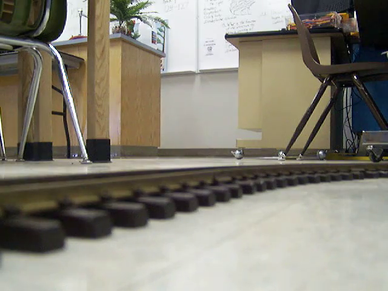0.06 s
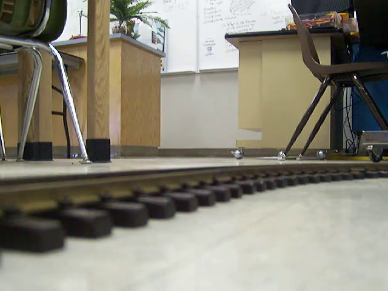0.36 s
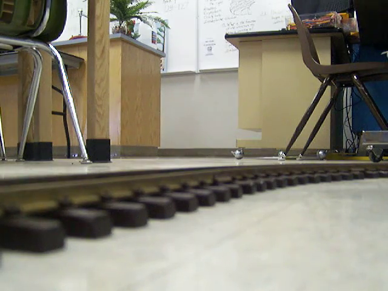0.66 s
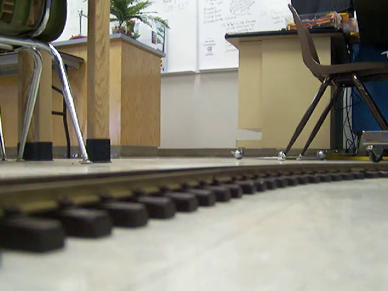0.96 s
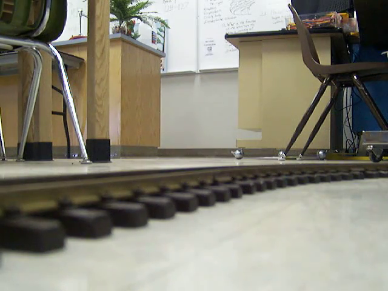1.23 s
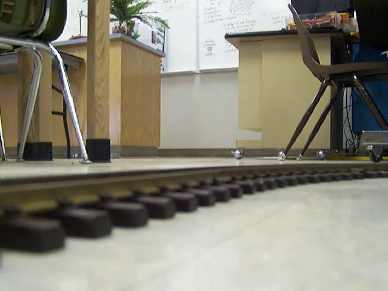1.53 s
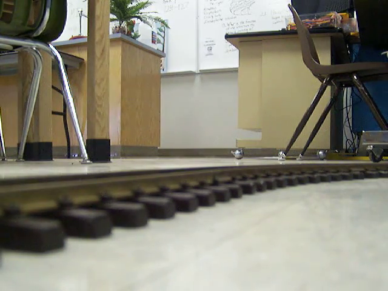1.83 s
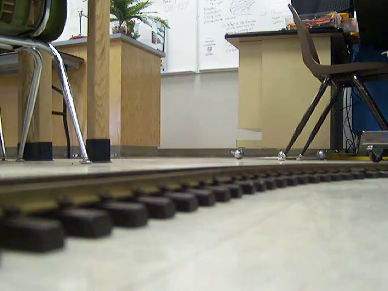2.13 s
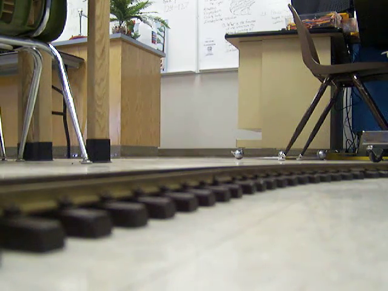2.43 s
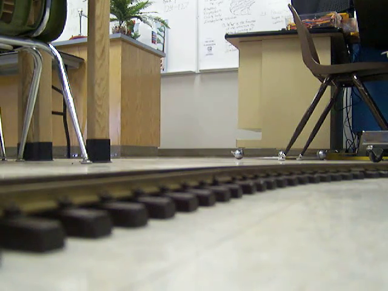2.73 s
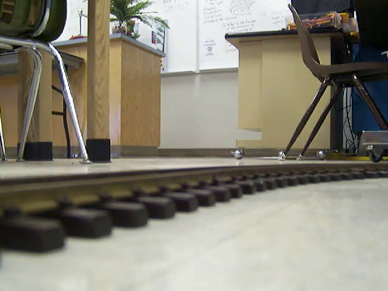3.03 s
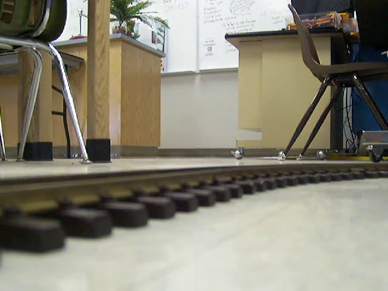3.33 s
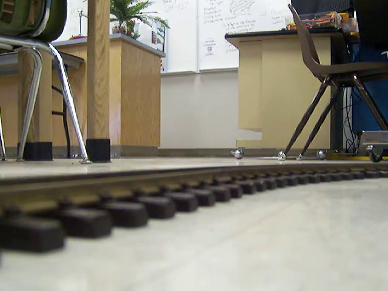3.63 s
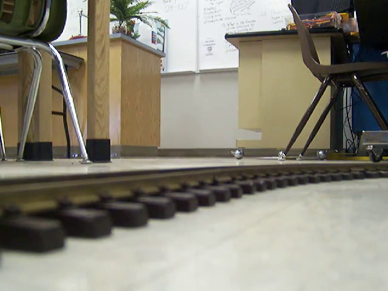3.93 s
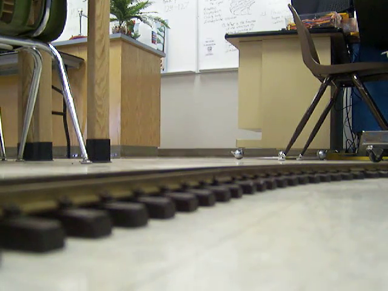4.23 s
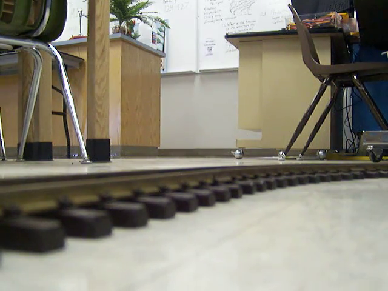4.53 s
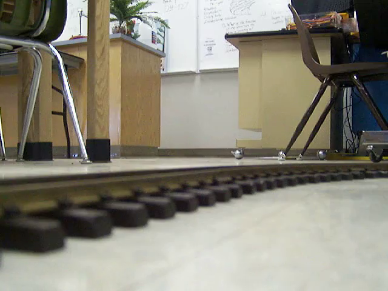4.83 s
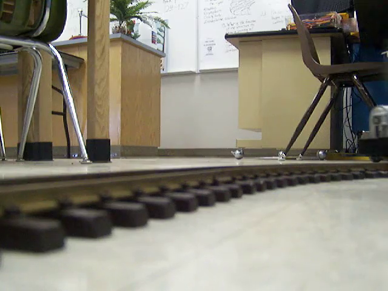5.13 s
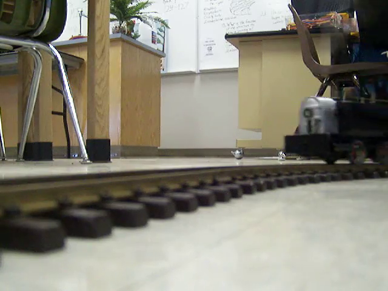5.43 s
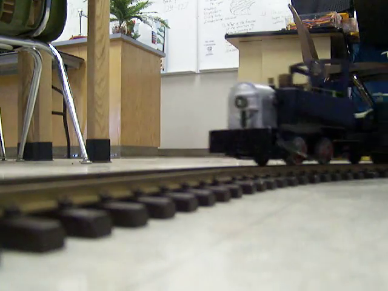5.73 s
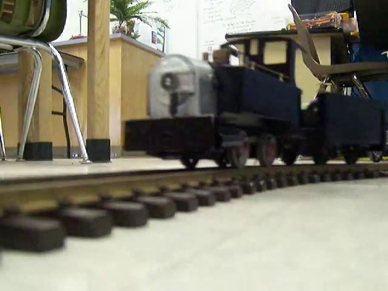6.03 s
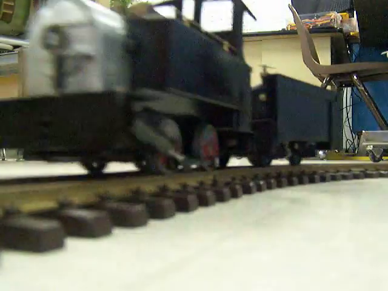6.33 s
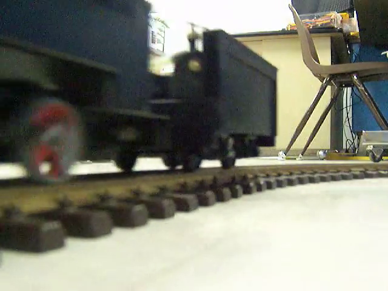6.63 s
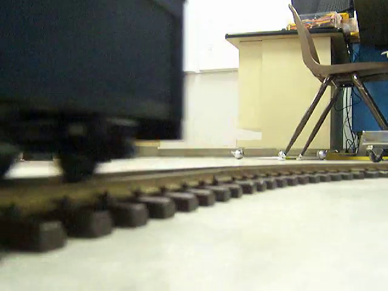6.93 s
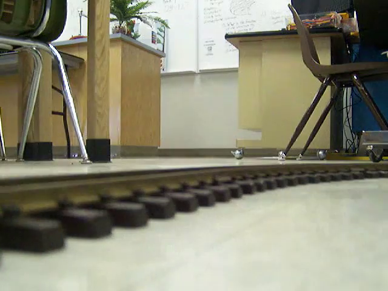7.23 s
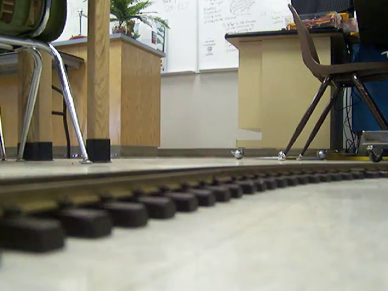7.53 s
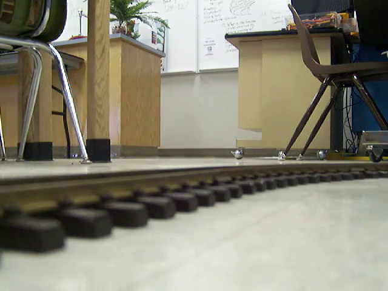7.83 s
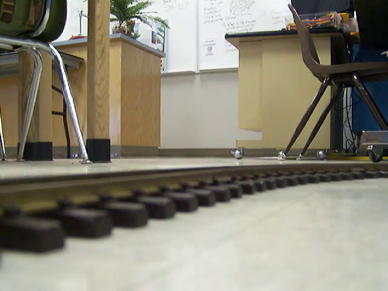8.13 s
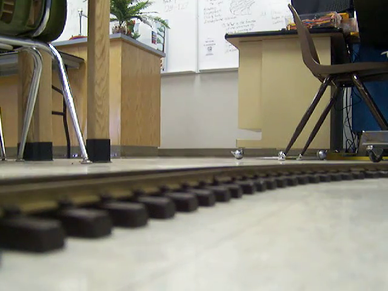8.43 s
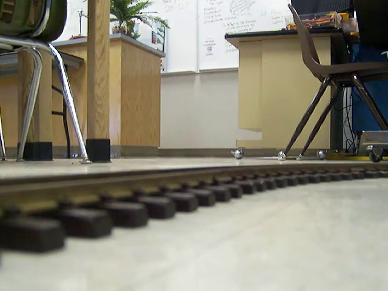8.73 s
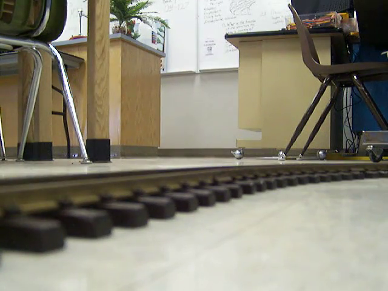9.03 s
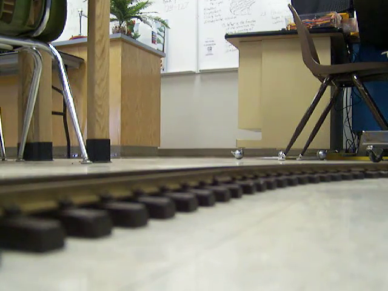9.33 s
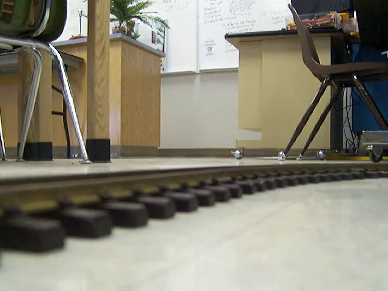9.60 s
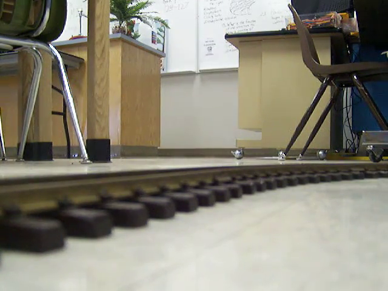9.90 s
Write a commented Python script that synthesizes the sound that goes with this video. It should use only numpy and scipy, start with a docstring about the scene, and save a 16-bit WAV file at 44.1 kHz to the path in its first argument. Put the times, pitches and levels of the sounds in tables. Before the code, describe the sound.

A small model steam locomotive circles a hard-floored room, chuffing quickly with sharp, wet spits over a steady hiss. Its rods knock, couplings clank and the burner gives a faint, breathy whistle. The sound swells early with loud sputters, keeps going, then passes close to the floor-level microphone from right to left with a brief rumble of wheels. It fades and builds again at the end, over a low fan hum.

```python
"""Model steam engine circling a room

A live steam model locomotive and tender circle a hard-floored room, passing close from right to left.
Each piston stroke knocks the rods and spits wet exhaust; the second cylinder puffs in between, and the
odd slug of water bursts loudly. Steam hisses, drops tick, couplings clank, the burner roars in its flue
and the rails ring, over fan hum and a deep rumble. The mix swells and sinks, coloured by two floor
microphones that each ring at a treble pitch of their own."""
import sys
import numpy as np
from scipy import signal
from scipy.fft import rfft, irfft, next_fast_len
from scipy.io import wavfile

SR = 44100
rng = np.random.default_rng(int(sys.argv[2]) if len(sys.argv) > 2 else 0)


def wav_record(signal):
    """Record a signal, one row per channel, as 16-bit PCM in the file named by sys.argv[1]."""
    frames = np.transpose(np.atleast_2d(signal))
    bounded = np.clip(frames, -1, 1)
    # unit amplitude maps onto the largest positive 16-bit level
    quanta = np.round(bounded * 32767).astype(np.int16)
    wavfile.write(sys.argv[1], SR, quanta)


N = 439236

# Spit, slug and drop levels are rms over 10 ms behind the microphones, before panning.
# Pan is left minus right.
# piston strokes: t/s, spit level/dB, spit pan/dB, knock peak before panning/dB
PISTON_STROKES = [(0.0566, -27.5, 8.5, -23), (0.224, -33.5, 3.5, -32), (0.3945, -28.5, 9, -31),
                  (0.548, -34, 5, -22), (0.715, -30, 0, -23), (0.88, -30, -5, -25),
                  (1.0513, -23.5, -7, -18), (1.224, -20, -3, -15), (1.402, -16.5, 0, -10.5),
                  (1.5783, -15.5, -7, -9.5), (1.758, -17, -10.5, -11), (1.9391, -15, -8, -8.5),
                  (2.1176, -16.5, -12, -11), (2.287, -16, -4, -17), (2.444, -15.5, -5, -16),
                  (2.589, -12, -5, -19), (2.735, -29, -8, -26), (2.889, -26.5, -15, -21),
                  (3.036, -26, -16, -21), (3.1871, -19, -6, -24), (3.339, -22.5, -15, -17.5),
                  (3.4948, -21.5, -11, -16), (3.6556, -22.5, -10, -17), (3.819, -20, -9, -21),
                  (3.9838, -19.5, -10, -24), (4.1505, -15, -9, -29), (4.3185, -17, -9.5, -19),
                  (4.490, -15, -13.5, -25), (4.662, -15, -11.5, -19), (4.8407, -17, -6, -24),
                  (5.024, -15, -6, -29), (5.212, -15, -8, -23), (5.4017, -13, -2.5, -25),
                  (5.597, -19, -7, -27), (5.797, -17, -8, -21), (6.005, -14.5, -7.5, -25),
                  (6.213, -17, -5, -30), (6.406, -11, -0.5, -34), (6.581, -14, 0, -19.5),
                  (6.742, -16, 1, -30), (6.8921, -19.5, 15, -16), (7.046, -21.5, 15, -26),
                  (7.201, -29, 6, -32), (7.355, -29, 8, -26), (7.513, -30.5, 9, -27), (7.675, -38, 7, -24),
                  (7.8395, -31, 3, -35), (8.016, -32, 3, -38), (8.180, -32, 8, -25.5),
                  (8.3533, -25, 7, -24), (8.5333, -33, -3, -25), (8.7135, -32, 8, -25),
                  (8.893, -26.5, 6, -21.5), (9.079, -30, 3, -17.5), (9.2653, -24.5, 1, -17.5),
                  (9.4586, -18.5, -4, -13.5), (9.655, -19.5, -8.5, -13), (9.8515, -13, -3.5, -11)]
# slugs of water bursting from the chimney: t/s, level/dB, length/s, pan/dB
WATER_SLUGS = [(0.28, -29.5, 0.01, 17), (0.6358, -24.5, 0.0038, 13), (0.801, -21, 0.007, 7),
               (0.8488, -13, 0.021, 2), (0.9657, -17.5, 0.012, 2), (1.1437, -16.5, 0.0044, 7),
               (1.3194, -18.5, 0.006, 4), (1.449, -6.5, 0.02, 0.5), (1.4939, -8.5, 0.023, 1),
               (1.5622, -8.5, 0.021, -4), (2.064, -7.5, 0.015, -2), (2.1782, -9.5, 0.011, -3),
               (2.6765, -9, 0.019, -3), (2.6965, -11, 0.011, -5), (2.7151, -12.5, 0.0068, -10),
               (3.0841, -11.5, 0.0076, -6), (3.6222, -11, 0.0074, 0), (3.749, -14, 0.0037, -3),
               (3.9127, -20, 0.0045, 2), (4.1845, -10.5, 0.0058, -1.5), (4.2905, -14.5, 0.0051, -2),
               (4.7658, -9, 0.005, -1), (4.774, -9, 0.0059, -1), (4.7931, -17, 0.0044, 0),
               (4.8888, -12.5, 0.0047, 0), (5.0542, -20, 0.004, 0), (5.4086, -21, 0.0059, 18),
               (5.416, -8, 0.0024, 1), (5.8313, -17.5, 0.0075, 4), (6.1083, -8, 0.0028, 7.5),
               (6.2414, -13.5, 0.0026, -3), (6.3304, -13.5, 0.0015, -8), (6.7008, -7, 0.0037, 3.5),
               (6.8061, -19.5, 0.0038, 6), (7.015, -16, 0.0032, 4), (7.2227, -21.5, 0.0068, 17),
               (7.241, -18, 0.0014, 17.5), (7.32, -21.5, 0.0035, 5), (7.6608, -28.5, 0.0053, 17),
               (7.7676, -21.5, 0.0053, 5.5), (8.4675, -24, 0.016, 5), (8.9713, -20, 0.016, 4),
               (9.6309, -11, 0.02, 0), (9.7587, -13, 0.0094, -4.5)]
# big drops ticking between the strokes: t/s, level/dB, pan/dB
BIG_DROPS = [(1.68, -20.5, 11), (2.653, -21, -11), (2.761, -18.5, -1), (3.144, -19, -1),
             (3.412, -19.5, -10), (3.682, -19, 5), (3.728, -23, 1), (4.2475, -17.5, -3), (4.346, -18.5, -2),
             (4.565, -23, -9), (4.870, -22, 4), (5.153, -22, -6), (5.243, -20.5, 1), (5.343, -23.5, -9),
             (5.531, -24, 0), (5.5515, -24.5, -1), (5.63, -22, 1), (5.735, -25, 4), (5.916, -25, -3),
             (6.040, -25, 7), (6.13, -23, 5), (6.301, -28, -5), (6.347, -27, -5), (6.537, -18.5, -1),
             (6.638, -22, -7), (6.653, -20.5, 3), (6.965, -21.5, 9), (7.144, -22.5, 11), (7.699, -28.5, 6),
             (7.811, -28.5, 4), (8.739, -32, 8), (9.118, -23, 1)]
# coupling clanks: t/s, peak before panning/dB, ring f/Hz, ring over the dull knock/dB
COUPLING_CLANKS = [(1.657, -18, 2400, 2), (1.837, -12, 2400, 0), (2.019, -15, 2360, 6),
                   (2.355, -13, 2580, 5), (2.412, -14.5, 2400, 0), (2.5204, -10.5, 2530, 6),
                   (2.65, -11.5, 2500, 1), (2.883, -13, 2570, 14), (2.996, -16, 1900, 5),
                   (3.404, -7.5, 2470, 8), (3.5297, -14, 2460, 6), (3.891, -19, 2500, -1),
                   (3.959, -11, 2510, 16), (5.1552, -15, 2400, -2), (5.972, -16.5, 1870, 8),
                   (6.651, -16, 2400, -7), (6.8046, -11, 2800, 5), (7.014, -11, 2880, -2),
                   (7.1258, -13.5, 2560, 11), (8.119, -22, 2520, -3), (9.36, -12.5, 2640, 10),
                   (9.545, -18, 2400, 2), (9.741, -12, 2400, -1)]

# the swell that steam, burner, rail ring and fan ride on: t/s, level/dB
SWELL_CURVE = [(0, -46.5), (0.45, -46.5), (1.4, -34.5), (2.1, -38.5), (2.68, -38), (2.75, -45),
               (3.5, -41.5), (4.2, -43.5), (4.63, -42), (4.7, -46), (5.4, -45.5), (5.45, -48.5),
               (6.2, -47.5), (8.5, -50), (9.65, -36), (9.96, -36)]
# direction of the engine: t/s, lag of the left side/ms, pan/dB
ENGINE_BEARING = [(0, 0.0077, 2), (1, 0.087, 0), (2.6, 0.19, -6.5), (4.5, 0.18, -4), (5.3, 0.02, -2.5),
                  (6.3, 0.0031, -3), (6.7, -0.12, 3), (7.2, -0.26, 6.5), (7.8, -0.1, 3), (8.6, -0.087, 1),
                  (9.1, 0.11, -1.5), (9.96, 0.12, -1)]
# steam, stronger as the engine nears: t/s, level over the swell/dB
STEAM_CURVE = [(0, 11), (1.0, 14.5), (1.35, 13.5), (1.7, 16), (3.501, 16), (4.45, 21), (4.75, 18.5),
               (6.35, 21), (6.85, 23), (7.12, 25), (7.32, 17), (8.399, 12), (9.96, 13)]
# burner between flares: t/s, level over the swell/dB
BURNER_CURVE = [(0, 3), (1.3, 3.5), (1.701, 5), (2.75, 1), (4, -2), (5.2, 7), (5.5, 4.5), (6, 11.5),
                (6.45, 8), (6.63, 14), (6.8, 6), (7.35, 5.5), (7.75, 9), (8.15, 0), (9.96, 4)]
# flare-ups of the flame: t/s, strength/dB
FLAME_FLARES = [(6.23, 5), (8.618, 14.5)]
# rails ringing on the far side of the loop: t/s, level over the swell/dB
RAIL_CURVE = [(0, -1), (1.2, -2.5), (2.68, 3.5), (2.8, -4), (3.5, -0.5), (4.62, 1.5), (4.72, -14.5),
              (8.499, -1), (9.3, -3.5), (9.96, -3)]

# tone of the wet exhaust: f/Hz, level/dB
SPIT_SPECTRUM = [(150, -17), (700, -11), (1500, -9.5), (2500, -6), (4000, -1), (5200, 2.5), (6300, -5),
                 (7500, -13), (9000, 4)]
# tone of the steam jet: f/Hz, level/dB
STEAM_SPECTRUM = [(150, -24.5), (400, -20), (800, -4), (1400, -1), (2000, -1), (2650, 2.5), (3200, 0),
                  (4200, -0.2), (5200, 2.5), (6300, -2.5), (7500, -11), (9000, -14.5)]
# tone of the ventilation noise: f/Hz, level/dB
VENT_SPECTRUM = [(12, 4.5), (28, 0), (46, -25.5), (60, -3.5), (78, 7), (100, -4.5), (143, 2), (175, -7.5),
                 (300, -11), (600, -10.5), (1300, -13), (2000, -13), (4000, -29)]
# hum of the fan and its motor: f/Hz, relative level/dB
FAN_TONES = [(19, 2.5), (79.5, -11), (120, -4), (200, -12.5)]
# tone of the building's rumble: f/Hz, level/dB
BUILDING_SPECTRUM = [(10, -9.5), (22, 0), (34, -1.5), (42, -2), (60, -16.5), (150, -39), (400, -70)]
# likeness of left and right in diffuse sound: f/Hz, correlation (clipped to -1..1 in use)
STEREO_LIKENESS = [(20, -1.1), (60, 1), (200, 0.91), (500, 0.93), (1000, 0.34), (1800, 0.12), (3000, 0.13),
                   (5000, -0.19)]

# modes of the engine's frame: f/Hz, width/Hz, level/dB
FRAME_MODES = [(1150, 650, -9), (1840, 270, 0), (2410, 200, -2), (3320, 1200, -6.5)]
# resonance of the burner flue: f/Hz, width/Hz, level/dB
FLUE_MODES = [(1083, 250, 0)]
# modes of the track under the wheels: f/Hz, width/Hz, level/dB
TRACK_MODES = [(328, 290, -12.5), (556, 220, -5), (690, 125, -1), (1495, 81, -3.5), (2560, 100, -14.5)]
# modes of the distant rails: f/Hz, width/Hz, level/dB
RAIL_MODES = [(719, 36, 4.5), (905, 56, 3.5), (1010, 320, -6.5), (1505, 70, -7), (1700, 120, -8),
              (1935, 40, -0.5)]
# microphone resonances, left then right: f/Hz, width/Hz, gain in the bass/dB
CAPSULES = [(6007, 716, -4.5), (4753, 990, -3.5)]

ROOM_T60_S = 0.13


def chuffs(steam_db, pan, spit_s=0.0028, puff_s=0.019, offbeat_share=0.53):
    """Cue a sharp spit per stroke and the second cylinder's puff between: t/s, dB, length/s, pan/dB."""
    cues = [(s, db, spit_s, side_db) for s, db, side_db, _ in PISTON_STROKES]
    times = np.array(PISTON_STROKES)[:, 0]
    for s in times[:-1] + offbeat_share * np.diff(times):
        at = int(s * SR)
        puff_db = steam_db[at] + 1.5 + 0.8 * rng.standard_normal()
        cues.append((s, puff_db, puff_s, pan[at] + 3))
    return cues


def spits(cues, lag_ms, wash_db=-19.5, stray_db=-15.0, spray_takeover_s=0.009):
    """Wet exhaust: a short spit is mostly one ping, a long one a lumpy spray that builds and dies."""
    out, t = np.zeros((2, N)), np.arange(4096) / SR
    for s, db, length, pan in cues:
        lag, sides = lag_ms[int(s * SR)], panned(pan)[:, None]
        lumps = from_db(-0.5 * np.interp(t, t[::40], rng.standard_normal(len(t[::40]))))
        noise = colour(arriving(np.full(len(t), lag), direct=0.17), SPIT_SPECTRUM)
        envelope = (1 - np.exp(-t / (0.12 * length))) * np.exp(-t / (0.96 * length))
        spray = levelled(noise * lumps * envelope)
        ping_share = np.exp(-length / spray_takeover_s)
        burst = np.sqrt(1 - ping_share) * spray + np.sqrt(ping_share) * ping(lag, hz=5100, size=len(t))
        scatter = unit_level(colour(diffuse(len(t)), SPIT_SPECTRUM))
        room_wash = scatter * from_db(wash_db - 60 * t / ROOM_T60_S) * (1 - np.exp(-t / 0.0031))
        add(out, s, from_db(db) * (burst * sides + room_wash))
        # one stray drop bursts just ahead, two trail behind
        delays_s = rng.uniform([-.012, .008, .025], [-.003, .025, .06])
        for delay, grain in zip(delays_s, np.split(scatter, 4, axis=1)):
            stray = grain * np.exp(-t[:grain.shape[1]] / .002)
            add(out, s + delay, from_db(db + stray_db) * sides * stray)
    return out


def ping(lag_ms, hz, size, spread_hz=247, ring_s=0.0007, echo_s=0.002, echo_db=-5):
    """One drop bursts: a sudden short ring, then its reflections off the boiler and the floor."""
    t = np.arange(size) / SR - np.array([[lag_ms], [-lag_ms]]) / 2000
    hz = hz + spread_hz * rng.standard_normal()
    out = 0
    for k, stretch in enumerate(rng.uniform(.7, 1.3, (4, 2, 1))):
        age = np.maximum(t - k * stretch * echo_s, 0)
        out = out + from_db(k * echo_db) * np.sin(2 * np.pi * hz * age) * np.exp(-age / ring_s)
    return levelled(out)


def rod_knocks(lag_ms):
    """The rods knock against the frame at every stroke, as their thrust reverses."""
    out = np.zeros((2, N))
    for s, _, _, db in PISTON_STROKES:
        add(out, s, from_db(db) * impact(s, lag_ms, FRAME_MODES, decay_s=0.01))
    return out


def couplings(lag_ms, ring_width_hz=170):
    """Couplings take up their slack: a dull knock on the frame, some with a short ring of their own."""
    out = np.zeros((2, N))
    for s, db, hz, ring_db in COUPLING_CLANKS:
        modes = FRAME_MODES + [(hz, ring_width_hz, ring_db)]
        add(out, s, from_db(db) * impact(s, lag_ms, modes, decay_s=0.0088))
    return out


def impact(s, lag_ms, modes, decay_s, tail_db=-21.5):
    """A short rattling contact rings a body and trails off in the room; peak 1."""
    t = np.arange(8192) / SR
    envelope = np.exp(-t / decay_s) + from_db(tail_db - 60 * t / ROOM_T60_S)
    rattle = arriving(np.full(len(t), lag_ms[int(s * SR)]), direct=0.92)
    ring = resonate(rattle * envelope, modes)
    return ring / np.abs(ring).max()


def steam(lag_ms, flutter_db=1.6, sizzle_db=-9.5, grains_per_s=80, spread_db=9.5):
    """A fluttering jet, sizzling with the tiny drops that burst in it."""
    onsets = rng.random(N) < grains_per_s / SR
    power = onsets * from_db(spread_db * np.minimum(rng.exponential(1, N), 2)) ** 2
    sizzle = signal.lfilter([1], [1, -np.exp(-1 / (.002 * SR))], power + 1e-18)  # 2 ms decay
    flow = np.sqrt(1 + from_db(sizzle_db) ** 2 * sizzle) * from_db(flutter_db * drift(20.0))
    return unit_level(colour(arriving(lag_ms, direct=0.22), STEAM_SPECTRUM) * flow)


def drops(steam_db, lag_ms, pan, count=200, small_db=-9.5, spread_db=2):
    """Drops tick at the chimney: the big ones, and a scatter of small ones riding the steam's level."""
    out = np.zeros((2, N))
    scatter = zip(rng.integers(0, N, count), spread_db * rng.standard_normal(count))
    small = [(at / SR, steam_db[at] + small_db + offset_db, pan[at]) for at, offset_db in scatter]
    for s, db, side_db in BIG_DROPS + small:
        tick = ping(lag_ms[int(s * SR)], hz=5240, size=1024)
        add(out, s, from_db(db) * panned(side_db)[:, None] * tick)
    return out


def burner(lag_ms, flare_db, whistle_hz=1090.5, waver_hz=26.11, breath_hz=42.4, sag_hz_per_db=5):
    """The flame roars in the flue and blows a breathy, wavering whistle that sags when it flares."""
    hz = whistle_hz + waver_hz * drift(7) - sag_hz_per_db * flare_db
    phase = 2 * np.pi * (np.cumsum(hz) / SR + hz * lag_ms / 2000 * np.array([[-1], [1]]))
    whistle = unit_level(drift(breath_hz) * np.cos(phase) + drift(breath_hz) * np.sin(phase))
    roar = from_db(2.0) * unit_level(resonate(arriving(lag_ms, direct=0.6), FLUE_MODES))
    flicker_db = 1.93 * drift(26)
    return unit_level(whistle + roar) * from_db(flare_db + flicker_db)


def flares(rise_s=0.0044, fall_s=0.13):
    """The flame jumps up and settles: its extra level in dB."""
    db = 0
    for s, strength_db in FLAME_FLARES:
        age = np.maximum(np.arange(N) / SR - s, 0)
        db = db + strength_db * (1 - np.exp(-age / rise_s)) * np.exp(-age / fall_s)
    return db


def wheels(lag_ms, pass_s=7.125, rise_db_per_s=50.5, fall_db_per_s=69, rounding_s=0.096, bump_db=2.0):
    """Rough wheels shake the rails and sleepers, rising to a rounded peak as they roll by."""
    t = np.arange(N) / SR - pass_s
    away = np.hypot(t, rounding_s)
    pass_db = -26.5 - rise_db_per_s * (away - t) / 2 - fall_db_per_s * (away + t) / 2
    roll = unit_level(resonate(arriving(lag_ms, direct=0.5), TRACK_MODES))
    return roll * from_db(pass_db + bump_db * drift(26)) * panned(2.0)[:, None]


def rails(lag_ms, bump_db=2.5):
    """The running wheels keep the rails ringing unevenly."""
    ring = unit_level(resonate(arriving(lag_ms, direct=0.55), RAIL_MODES))
    return ring * from_db(bump_db * drift(5.2))


def ventilation(rumble_db=2.5, waver_db=1.0):
    """The fan and its motor lay a wavering hum over the room's rumble."""
    t, hum = np.arange(N) / SR, 0
    for hz, db in FAN_TONES:
        gain = np.sqrt(2) * from_db(db + waver_db * drift(2.0))
        hum = hum + gain * np.sin(2 * np.pi * hz * t + .5 * drift(2.9))
    return from_db(rumble_db) * unit_level(colour(diffuse(N), VENT_SPECTRUM)) + hum


def building(level_db=-45):
    """The building's deep, steady rumble beds everything, whatever the engine does."""
    return from_db(level_db) * unit_level(colour(diffuse(N), BUILDING_SPECTRUM))


def arriving(lag_ms, direct):
    """White noise from the engine: a share of the power comes straight, the rest off the walls."""
    at, half_lag = np.arange(len(lag_ms)), lag_ms * SR / 2000
    source = rng.standard_normal(len(at))
    straight = np.array([np.interp(at - half_lag, at, source), np.interp(at + half_lag, at, source)])
    return np.sqrt(direct) * straight + np.sqrt(1 - direct) * diffuse(len(at))


def diffuse(size):
    """White noise from all around: near mono in the low mids, wide in the treble."""
    padded = next_fast_len(size, True)
    mid, side = rfft(rng.standard_normal((2, padded)))
    alike = np.clip(at_bins(STEREO_LIKENESS, padded), -1, 1)
    spectrum = np.sqrt((1 + alike) / 2) * mid + np.sqrt((1 - alike) / 2) * side * [[1], [-1]]
    return irfft(spectrum, padded)[:, :size]


def microphones(x):
    """Each capsule is flat in the bass, peaks at its resonance and falls away above."""
    out = []
    for channel, (hz, width, db) in zip(x, CAPSULES):
        r = np.exp(-np.pi * width / SR)
        poles = [1, -2 * r * np.cos(2 * np.pi * hz / SR), r * r]
        out.append(from_db(db) * signal.lfilter([sum(poles)], poles, channel))
    return np.array(out)


def resonate(x, modes):
    """Ring parallel resonances of alternating sign."""
    out = 0
    for k, (hz, width, db) in enumerate(modes):
        r = np.exp(-np.pi * width / SR)
        poles = [1, -2 * r * np.cos(2 * np.pi * hz / SR), r * r]
        gain = (-1) ** k * from_db(db) * (1 - r * r) / 2
        out = out + gain * signal.lfilter([1, 0, -1], poles, x)
    return out


def drift(rate_hz):
    """Smooth random modulation of rms 1, drawn every 40 samples."""
    r = np.exp(-2 * np.pi * rate_hz * 40 / SR)
    slow = signal.lfilter([1], [1, -2 * r, r * r], rng.standard_normal(N // 40 + 2002))[2000:]
    return np.interp(np.arange(N) / 40, np.arange(len(slow)), slow / rms(slow))


def colour(x, spectrum):
    """EQ a sound with a spectrum table."""
    size = x.shape[-1]
    return irfft(rfft(x) * from_db(at_bins(spectrum, size)), size)


def at_bins(points, size):
    """A frequency table at the bins of a transform."""
    hz, value = np.transpose(points)
    return np.interp(np.log(np.arange(size // 2 + 1) * SR / size + 1), np.log(hz), value)


def automation(rows, column=1):
    """One column of a time curve at every sample."""
    columns = np.transpose(rows)
    return np.interp(np.arange(N) / SR, columns[0], columns[column])


def unit_level(x):
    """Scale a steady sound to rms 1 behind the microphones."""
    return x / rms(microphones(x))


def levelled(sound):
    """Scale each side of a one-shot to the energy of 10 ms at rms 1 behind the microphones."""
    return sound / np.sqrt(np.sum(microphones(sound) ** 2, axis=1, keepdims=True) / (.01 * SR))


def add(out, s, sound):
    """Mix a sound in at s seconds."""
    at = max(round(s * SR), 0)
    out[:, at:at + sound.shape[1]] += sound[:, :max(N - at, 0)]


def panned(db):
    """Left and right gains for a pan in dB."""
    return from_db(np.array([db, -db]) / 2)


def from_db(db):
    """Decibels to gain."""
    return 10 ** (np.asarray(db) / 20)


def rms(x):
    """Root mean square."""
    return np.sqrt(np.mean(x ** 2) + 1e-20)


def scene():
    """Mix the circling engine, its track and the room tone."""
    swell_db = automation(SWELL_CURVE)
    lag_ms, pan = automation(ENGINE_BEARING), automation(ENGINE_BEARING, column=2)
    steam_db = swell_db + automation(STEAM_CURVE)
    hiss = from_db(steam_db) * steam(lag_ms)
    flame = from_db(swell_db + automation(BURNER_CURVE)) * burner(lag_ms, flares())
    track = from_db(swell_db + automation(RAIL_CURVE)) * rails(lag_ms) + wheels(lag_ms)
    fan = from_db(swell_db + 1.5) * ventilation() * panned(-0.43)[:, None]
    rattle = couplings(lag_ms) + rod_knocks(lag_ms)
    exhaust = spits(WATER_SLUGS + chuffs(steam_db, pan), lag_ms) + drops(steam_db, lag_ms, pan)
    running = (hiss + rattle) * panned(pan) + (flame + track) * panned(0.24 * pan)
    return exhaust + running + fan + building()


def record(dry, treble_hz=7700, cutoff_hz=15000, ceiling=0.96):
    """Ringing microphones, a narrow treble range, overload on the loudest spits."""
    narrow = signal.sosfilt(signal.cheby1(10, .3, treble_hz, fs=SR, output="sos"), microphones(dry))
    clipped = np.clip(narrow, -ceiling, ceiling)
    return signal.sosfilt(signal.butter(14, cutoff_hz, fs=SR, output="sos"), clipped)


dry = scene()
out = record(dry)
wav_record(out)
```